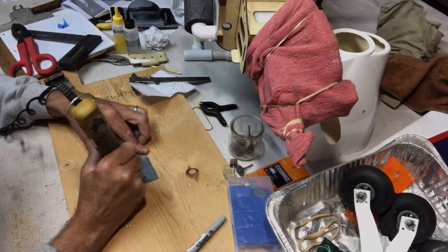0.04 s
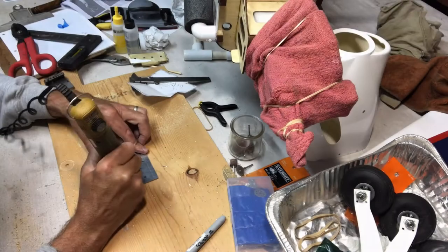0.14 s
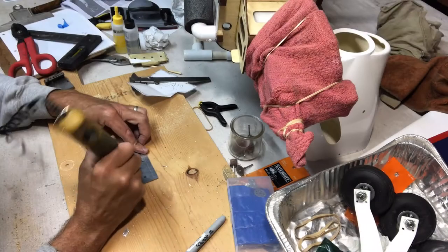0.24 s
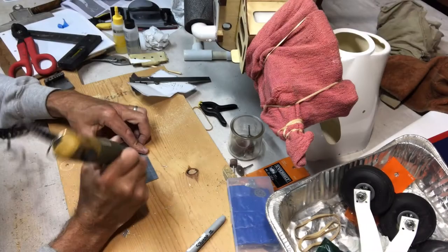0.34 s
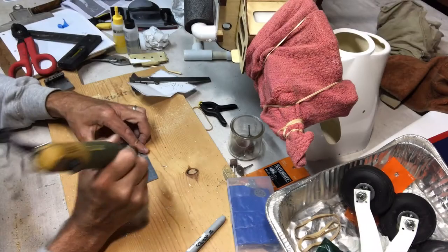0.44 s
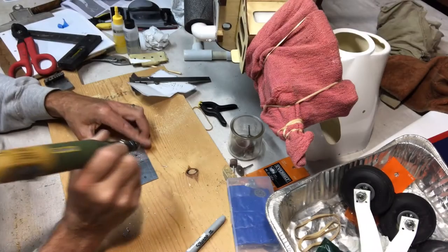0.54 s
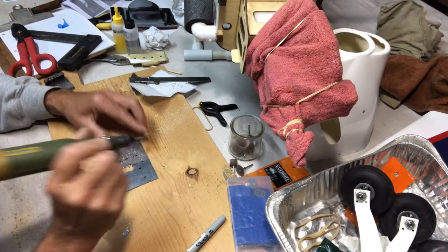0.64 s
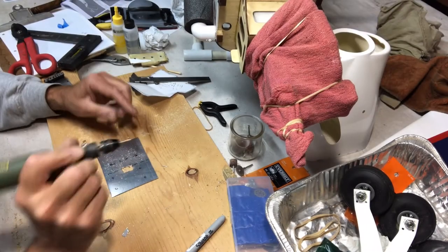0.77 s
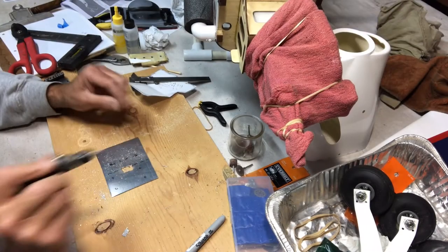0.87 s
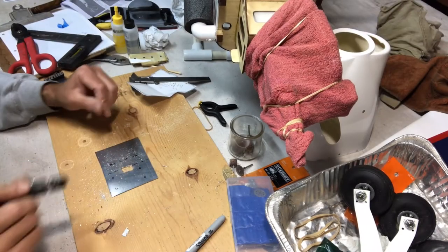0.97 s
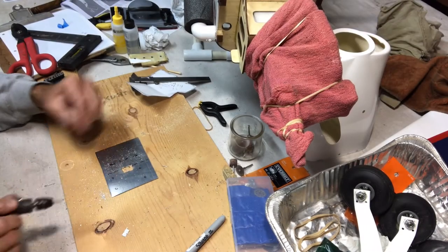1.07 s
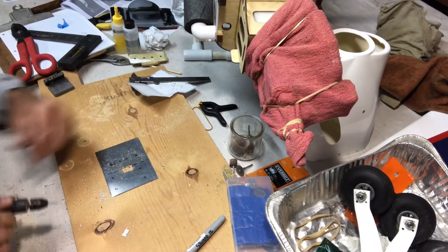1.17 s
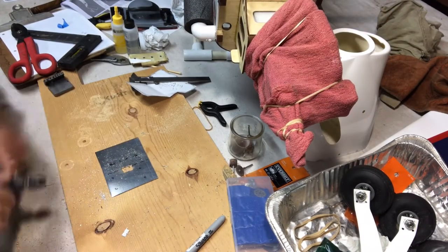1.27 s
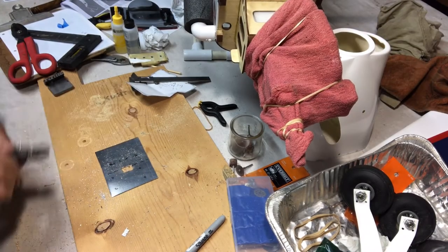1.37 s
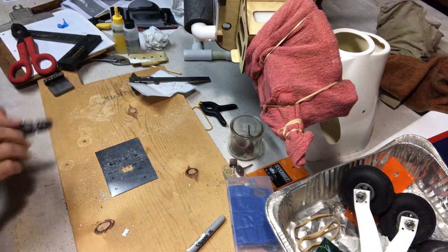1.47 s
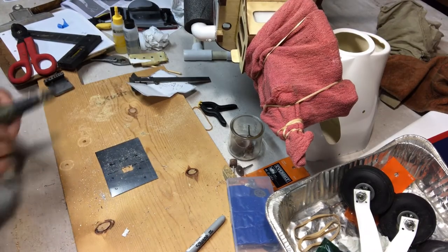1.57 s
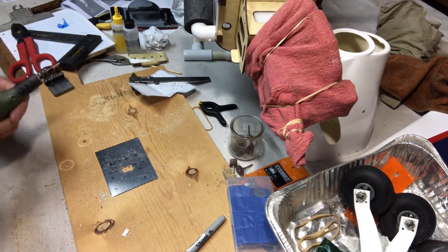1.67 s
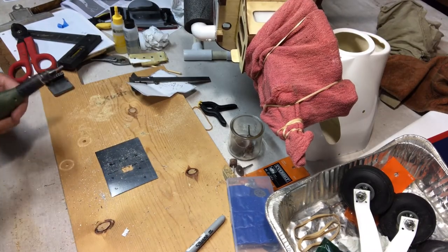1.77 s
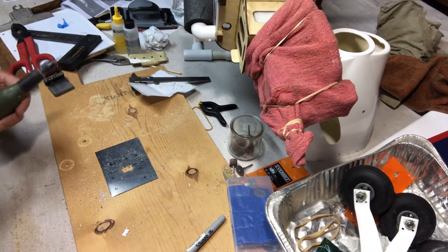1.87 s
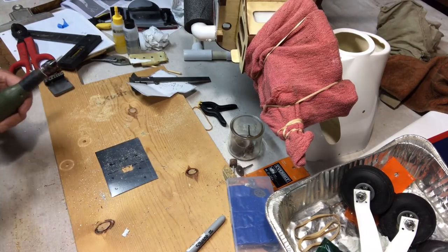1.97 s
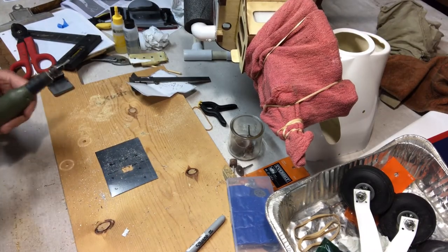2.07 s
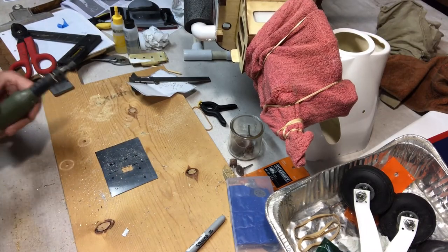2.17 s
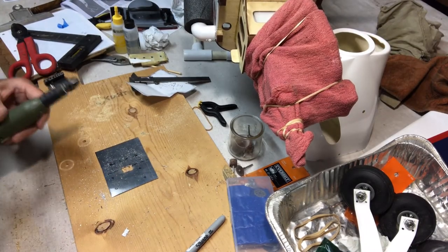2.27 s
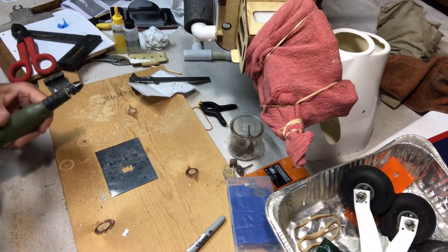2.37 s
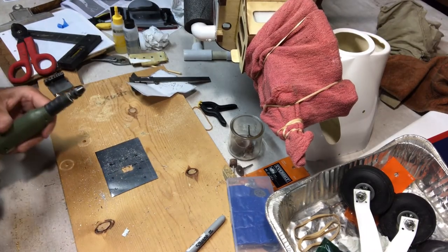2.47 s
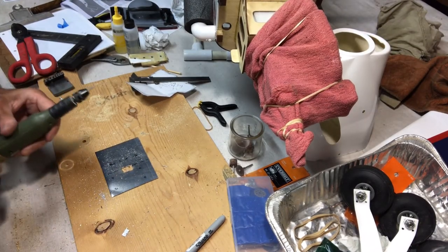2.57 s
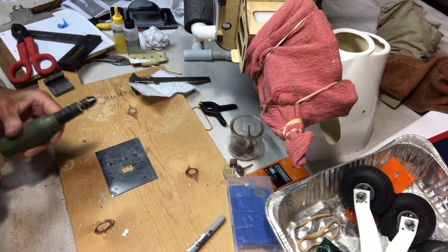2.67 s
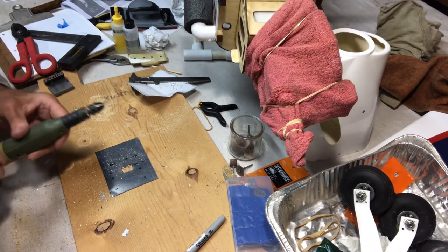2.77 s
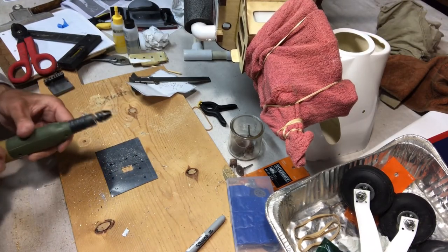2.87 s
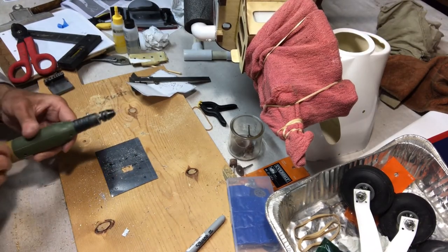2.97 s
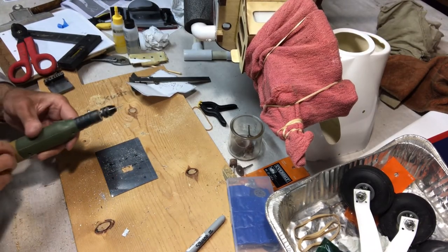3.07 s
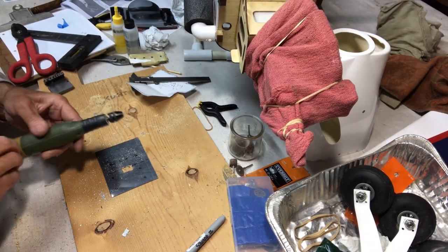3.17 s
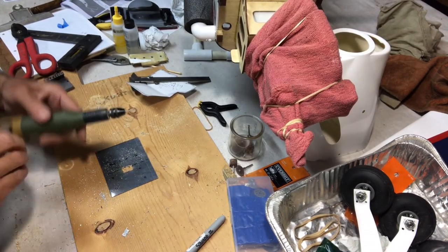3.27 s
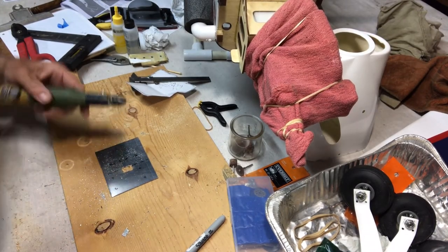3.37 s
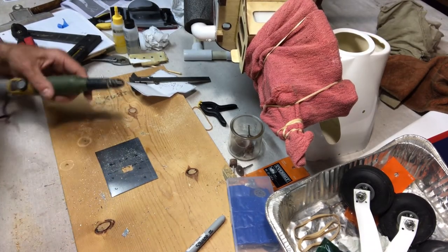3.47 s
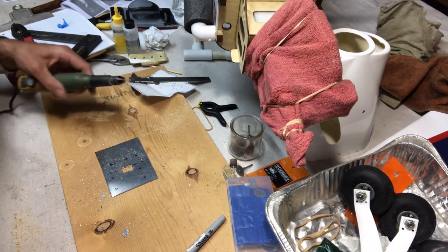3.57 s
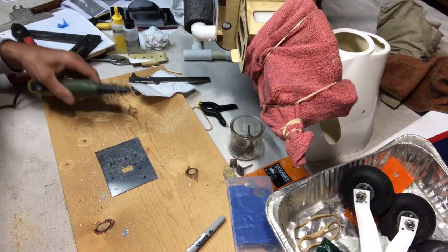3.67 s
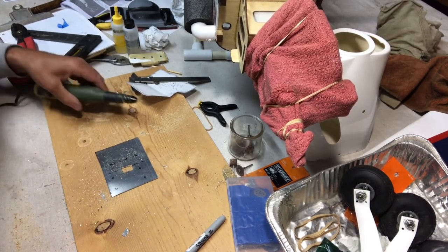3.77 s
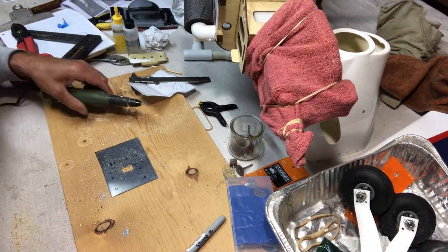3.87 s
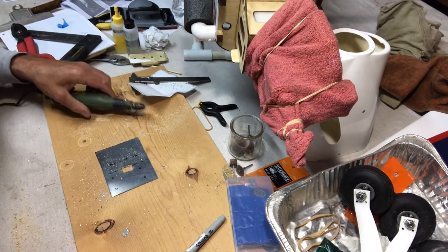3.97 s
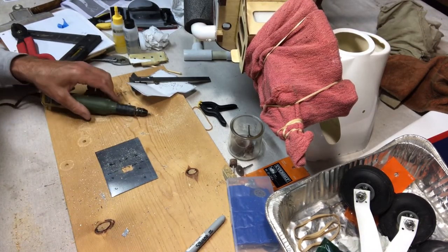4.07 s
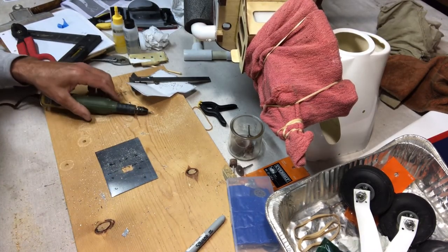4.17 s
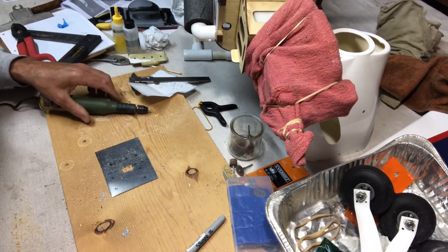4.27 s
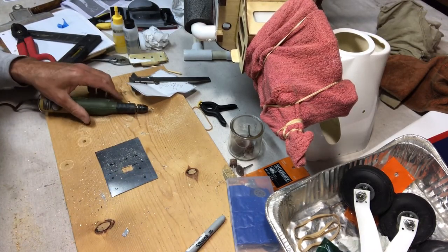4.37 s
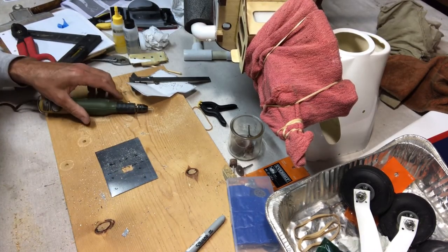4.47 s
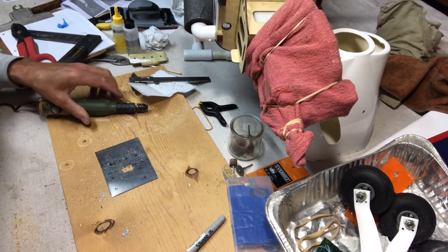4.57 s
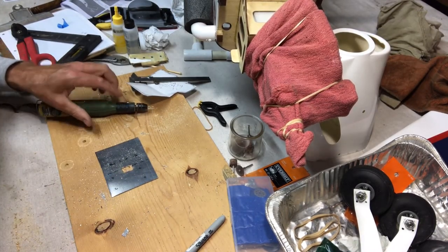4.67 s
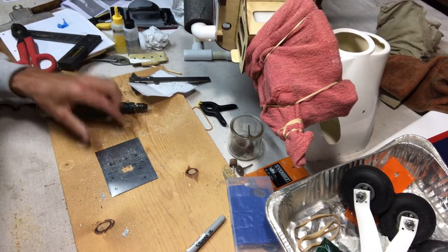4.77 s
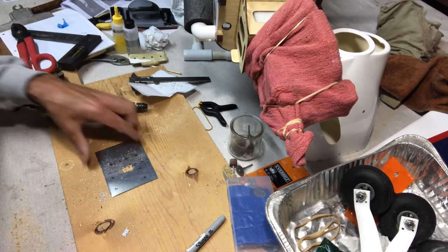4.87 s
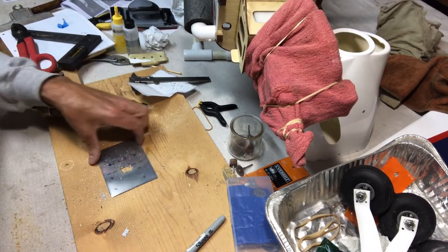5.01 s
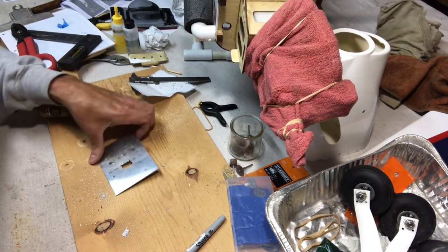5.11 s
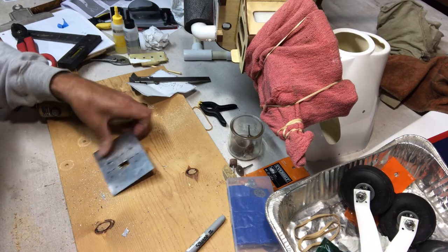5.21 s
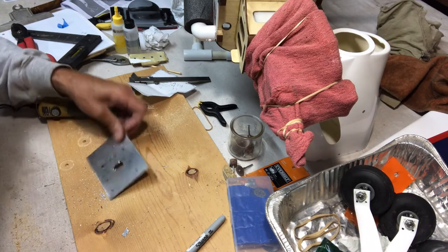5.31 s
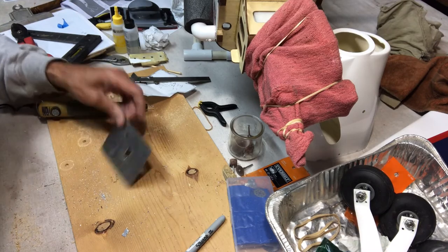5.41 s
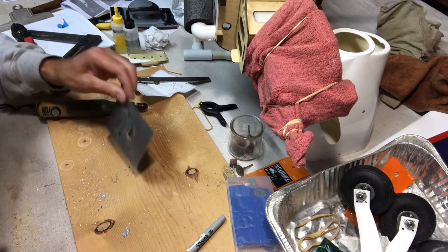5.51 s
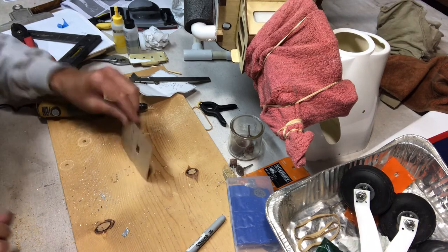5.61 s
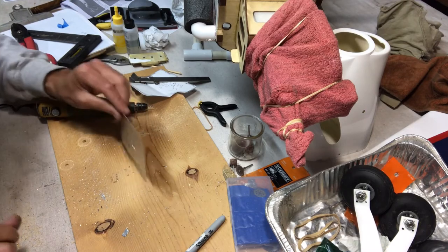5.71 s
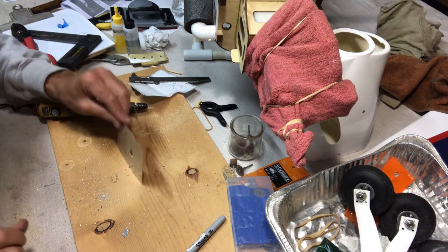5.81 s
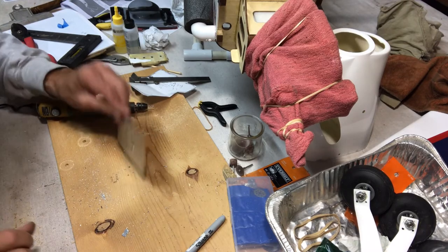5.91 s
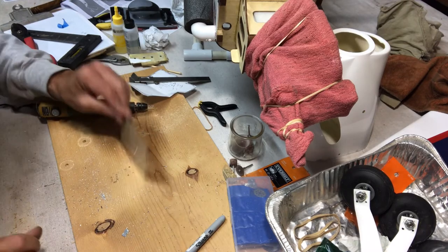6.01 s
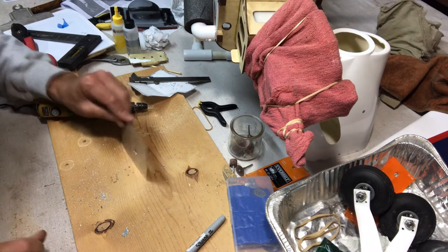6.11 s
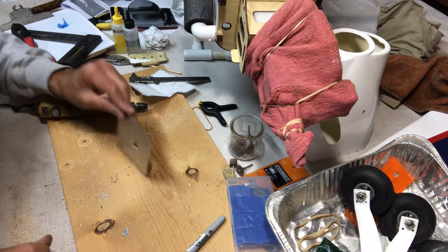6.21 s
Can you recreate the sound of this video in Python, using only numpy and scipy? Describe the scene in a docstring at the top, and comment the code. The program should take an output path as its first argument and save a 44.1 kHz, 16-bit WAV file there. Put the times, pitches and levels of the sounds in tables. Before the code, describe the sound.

A small rotary tool leaves thin metal, whines freely, winds down to a rattling stop, then a metal sheet is dragged up and rapped on wood.

```python
"""Rotary tool and thin sheet metal

A small rotary tool leaves a thin metal sheet, whines free, is switched off, coasts down, is laid on a wooden bench.
A hand rustles over, drags the sheet up so that it rings, and taps its edge four times on the bench, clipping.
Tool: sines on shaft multiples, casing-filtered noise beaten once a turn, vent noise. Contacts: noise into damped modes.
Hand: noise swells and stutter. Whistle: two gliding near-sines. All but shop noise and sway gets a short room tail.
"""
import sys
import numpy as np
from scipy import signal
from scipy.fft import rfft, irfft
from scipy.io import wavfile
from scipy.ndimage import uniform_filter1d, map_coordinates

SR = 44100
rng = np.random.default_rng(int(sys.argv[2]) if len(sys.argv) > 2 else 0)


def generate_wav(signal):
    """Clip the signal to [-1, 1] and save it as 16-bit WAV at the path in sys.argv[1]."""
    frames = np.transpose(np.atleast_2d(signal))
    scaled = np.clip(frames, -1, 1) * 32767
    pcm = np.round(scaled).astype(np.int16)
    wavfile.write(sys.argv[1], SR, pcm)


N = 275625
TIME = np.arange(N) / SR


def undb(db):
    """dB to amplitude ratio."""
    return 10 ** (np.asarray(db) / 20)


def unit(x):
    """Scale to rms 1."""
    return x / np.sqrt(np.mean(x ** 2))


def noise(count=N):
    """White Gaussian noise."""
    return rng.standard_normal(count)


def columns(table, outside=-120.):
    """Table columns as curves in time; `outside` beyond the table's ends."""
    s, *rest = np.transpose(table)
    return [np.interp(TIME, s, c, outside, outside) for c in rest]


def humps(table, rise=0.96):
    """One gain curve per dB column: a bell per row (centre, width), rising side narrowed by `rise`."""
    out = np.zeros((len(table[0]) - 2, N))
    for s, width, *db in table:
        near = slice(max(int((s - 4 * width) * SR), 0), int((s + 4 * width) * SR))
        t = TIME[near] - s
        side_width = np.where(t < 0, rise * width, width)
        out[:, near] += np.outer(undb(db), np.exp(-.5 * (t / side_width) ** 2))
    return out


def colour(x, points):
    """Filter by (Hz, dB) points on a log-frequency axis; rms 1."""
    hz, db = np.transpose(points)
    f = np.arange(N // 2 + 1) * SR / N + 1
    gain = undb(np.interp(np.log(f), np.log(hz), db, -90, -90))
    return unit(irfft(rfft(x) * gain, N))


def band(x, hz, width_hz):
    """Two-pole resonance, gain 1 at the centre."""
    return signal.lfilter(*signal.iirpeak(min(hz, .45 * SR), hz / width_hz, SR), x)


def steep(x, hz, width_hz):
    """Resonance applied twice; rms 1."""
    return unit(band(band(x, hz, width_hz), hz, width_hz))


def ring(force, modes):
    """Damped modes (Hz, dB, t60 s) driven by a force."""
    out = 0
    for hz, db, t60_s in modes:
        r = np.exp(-np.log(1000) / (t60_s * SR))
        w = 2 * np.pi * hz / SR
        out = out + undb(db) * signal.lfilter([0, r * np.sin(w)], [1, -2 * r * np.cos(w), r * r], force)
    return out


def walk(rate_hz):
    """Random levels held 1 / rate_hz s and slewed twice; spread near 1."""
    hold = max(int(SR / rate_hz / 32), 1)
    coarse = np.repeat(noise(N // 256), hold)[:N // 32 + 1]
    coarse = uniform_filter1d(uniform_filter1d(coarse, hold), hold)
    return 1.3 * uniform_filter1d(np.repeat(coarse, 32)[:N], size=32)


def grit(spread_db):
    """Noise of uneven grains; rms 1."""
    return unit(noise() * undb(spread_db * np.minimum(rng.exponential(size=N), 4)))


def clatter(turn, renew_turns):
    """Noise repeating every turn, renewed over `renew_turns`: blurred lines on all orders; rms 1."""
    pattern = noise((512, 128))
    where = [turn / renew_turns, turn % 1 * 128]
    return unit(map_coordinates(pattern, where, order=1, mode="grid-wrap"))


# shop noise spectrum: [f/Hz, relative level/dB per Hz]
SHOP_SPECTRUM = [(53, -18), (90, -1.5), (135, -26.5), (170, -3.5), (240, -10.5), (488, -9.5), (753, -14.5),
                 (956, -23), (1870, -18.5), (4170, -29), (12500, -26), (14000, -35.5), (16000, -44)]
SHOP_DB, SHOP_SWELL_DB = -61, 2.5


def shop():
    """Low-weighted background noise, slowly swelling."""
    return undb(SHOP_DB + SHOP_SWELL_DB * walk(2.35)) * colour(noise(), SHOP_SPECTRUM)


# bench and mount set swaying under the microphone: [centre t/s, width/s, sway level/dB, buffeting level/dB]
SWAYS = [(1.0, 0.36, -37, -67), (1.5, 0.1, -25.5, -39.5), (1.76, 0.14, -34, -72),
         (3.43, 0.07, -28.5, -58.5), (3.7, 0.17, -30.5, -48.5), (3.975, 0.0073, -31.5, -22.5),
         (4.1, 0.1, -31.5, -44.5), (4.39, 0.043, -45.5, -75.5), (4.7, 0.023, -38, -61),
         (4.96, 0.13, -32, -55.5), (5.2, 0.096, -50, -56.5), (5.58, 0.041, -25, -49),
         (5.72, 0.033, -23.5, -30), (5.9, 0.087, -24.5, -40), (6.05, 0.022, -25, -46),
         (6.13, 0.072, -27, -48)]
# sway spectrum: [f/Hz, relative level/dB per Hz]
SWAY_SPECTRUM = [(5.9, -21.5), (10, 12), (20, -7.5), (60, -14.5), (78, -49.5), (130, -120)]
CALM_SWAY_DB, CALM_BUFFET_DB = -45, -59


def mount_sway():
    """Low-frequency noise: sway plus buffeting near 45 Hz, swelling over a calm floor."""
    sway, buffet = humps(SWAYS) + undb([[CALM_SWAY_DB], [CALM_BUFFET_DB]])
    return sway * colour(noise(), SWAY_SPECTRUM) + buffet * steep(noise(), 45.0, 75.0)


FREE_HZ, LOAD_HZ, RELIEF_S, RECOVER_S = 379.1, 23.5, .05, .23
OFF_S, FRICTION_HZ_PER_S, DRAG_PER_S = 2.1016, 127.9, .4788


def shaft():
    """Turns per second: held down by the bite, recovers; after switch-off friction and air drag slow it."""
    driven = FREE_HZ - LOAD_HZ * np.exp(-np.maximum(TIME - RELIEF_S, 0) / RECOVER_S)
    stall = FRICTION_HZ_PER_S / DRAG_PER_S
    coasting = (driven + stall) * np.exp(-DRAG_PER_S * np.maximum(TIME - OFF_S, 0)) - stall
    return np.maximum(coasting, 0)


# the bit's last catches in the sheet: [centre t/s, width/s, knocking level/dB, screech level/dB]
BITE = [(.005, 0.019, -46, -35), (.081, 0.011, -35.5, -31), (.098, 0.0051, -36.5, -43),
        (.114, 0.0051, -44, -29)]


def bite(turn):
    """Once-a-turn decaying strikes and uneven grains, both through resonances."""
    knocking, screeching = humps(BITE)
    strike = np.exp(-(turn % 1) / 0.032)
    knock = steep(strike, 700.0, 610.0) + steep(strike, 3740.0, 570.0)
    knock += .5 * steep(strike, 1470.0, 320.0) + 1.25 * steep(strike, 5900.0, 2000.)
    screech = unit(band(grit(5.2), 6200.0, 15000.0)) + 0.93 * steep(grit(6.5), 9600.0, 970.0)
    screech += .5 * steep(grit(4.2), 6700.0, 670.0) + 0.76 * steep(grit(0.85), 2140.0, 400.0)
    return knocking * knock + screeching * screech


# tones: [multiple of shaft rate, relative level/dB]; levels apply to multiples without a column below
ORDERS = [(1, -8), (2, -6), (3, -0.5), (4, -7), (5, -5), (6, -6), (7, -5), (8, -4), (9, -5.5), (10, -13.5),
          (11, -4.5), (12, -19.5), (13, -11.5), (14, -14), (15, -9.5), (16, -9), (17, -7), (18, -6),
          (19, -19), (20, 0), (21, -12), (22, -14), (23, -7.5), (24, -2), (25, -10), (26, -4), (27, -29),
          (28, -13.5), (29, -22.5), (30, -24.5), (31, -27), (32, -7.5), (33, -18), (34, -18.5)]
# clearest tones as the tool turns: [t/s, level/dB of unbalance hum, fan, collet, brush, slot, top whine]
WHINE = [(0, -27, -62, -54, -49, -38, -56), (.07, -34.5, -65, -42, -39, -32, -51),
         (.11, -45, -54.5, -55, -36, -36, -63), (.44, -47.5, -43.5, -62, -41, -38.5, -65),
         (.6, -45, -46, -43.5, -30.5, -36, -52), (.84, -39, -56, -40.5, -33, -44.5, -41),
         (1.05, -34.5, -34, -34.5, -24.5, -54, -41), (1.19, -36, -39.5, -55, -38.5, -27.5, -31),
         (1.34, -41, -32, -54, -16.5, -27.5, -38), (1.47, -39, -33.5, -55, -38, -33, -44.5),
         (1.65, -36.5, -34, -45, -32.5, -25, -31), (1.87, -37, -32.5, -41, -30, -29.5, -43),
         (2.09, -38, -33, -48, -37.5, -40, -64), (2.2, -39, -30, -47.5, -34, -29, -66),
         (2.43, -44, -38, -49, -63, -70, -43), (2.7, -48.5, -39, -48, -55.5, -41, -67),
         (3, -76, -52, -59, -73, -70, -71), (3.4, -75, -68, -64, -68, -73.5, -75)]
# shaft multiples of the WHINE level columns
WHINE_ORDERS = (1, 5, 8, 20, 24, 28)
# further tones: [t/s, five levels/dB]
OVERTONES = [(0, -39, -39, -55, -60, -53), (0.05, -34, -49, -54, -54, -50), (0.1, -40, -34, -53, -50, -49),
             (0.14, -63, -55, -45, -70, -55), (0.3, -61, -44.5, -49, -67, -60),
             (0.55, -54.5, -56, -57, -54, -47.5), (0.75, -54, -46, -72, -57, -51),
             (0.95, -43.5, -37, -63, -37, -35), (1.15, -44.5, -43.5, -49, -41.5, -45),
             (1.35, -62, -38, -45.5, -49, -36.5), (1.55, -42, -39, -40.5, -45, -36),
             (1.75, -52, -43, -43.5, -50, -47.5), (1.95, -66, -53, -41, -53, -41),
             (2.1, -50, -36, -46, -42, -42), (2.25, -51, -39.5, -43, -43, -42),
             (2.4, -53.5, -53, -37, -52, -53), (2.6, -59.5, -54, -55, -59, -49),
             (2.8, -65, -56, -44, -65, -67), (3.05, -74, -83, -66, -64, -48),
             (3.4, -67, -67, -63, -75, -75)]
# shaft multiples of the OVERTONES level columns
OVERTONE_ORDERS = (2, 3, 6, 14, 16)
# casing response to the gliding tones, except overtones, while coasting: [f/Hz, gain/dB]
COASTING = [(300, -4.5), (1000, 2), (1400, -7), (1900, 1.5), (2600, 9), (3500, -13), (4300, -18),
            (5100, -9), (5900, -16), (8000, -6), (13000, 3)]
WAVER_TURNS_PER_ORDER = .0065  # blurs the higher tones more
WHINING = slice(int(3.5 * SR))  # tones computed up to 3.5 s


def shaft_tones(hz, turn, log_speed, coast, air_db, boom_db, collet_db):
    """Sines on shaft multiples, wavering in level and phase."""
    tabled = dict(zip(WHINE_ORDERS + OVERTONE_ORDERS, columns(WHINE) + columns(OVERTONES)))
    coast_hz, coast_db = np.transpose(COASTING)
    tones = np.zeros(N)
    for order, db in ORDERS:
        k = round(order)
        if k in tabled:
            level_db = tabled[k]
        else:  # follow the noise near them; higher ones fade faster with speed
            if k < 6:
                follow_db = boom_db - 8 + 40 * log_speed
            elif k < 12:
                follow_db = collet_db - 8 + 70 * log_speed
            else:
                follow_db = air_db - 8 + 75 * log_speed
            level_db = follow_db + db - 2.5 + 4.14 * walk(4.25)
        if k not in OVERTONE_ORDERS:
            level_db = level_db + coast * np.interp(k * hz, coast_hz, coast_db)
        level_db = level_db + min(0.53 * k, 2.2) * walk(30.5)
        start_turns = rng.random()
        waver_turns = (0.042 + WAVER_TURNS_PER_ORDER * k) * walk(25.)
        phase = 2 * np.pi * (k * turn + start_turns + waver_turns)
        tones[WHINING] += np.sqrt(2) * undb(level_db[WHINING]) * np.sin(phase[WHINING])
    return tones


def turn_beat(hz, turn):
    """Gain decaying within each turn; at low speed each turn is its own uneven knock."""
    slow = np.clip(1 - hz / 190, 0, 1)
    knock_size = undb(4 * noise(2048))[turn.astype(int)]
    decay = np.exp(-(turn % 1) / (0.44 - 0.067 * slow))
    beat = 1 - (0.15 + .5 * slow) * (1 - 5.83 * decay * knock_size ** slow)
    return uniform_filter1d(beat, size=48) * (1 - slow) + uniform_filter1d(beat, size=130) * slow


# housing, nose, collet, brush caps: [f/Hz, width/Hz]
CASING = [(1085, 380), (1920, 520), (2900, 1700), (5400, 2400)]


def casing_rattle(turn, beat, repeat, casing_db):
    """Beaten, partly turn-repeating noise in the casing resonances, over a low murmur."""
    loose = .4 * repeat
    rattle = 0
    for (hz, width_hz), db in zip(CASING, casing_db):
        level = undb(db + 1.6 * walk(14)) / np.hypot(1, loose)
        drive = beat * (noise() + loose * clatter(turn, 4.))
        rattle = rattle + level * steep(drive, hz, width_hz)
    murmur = undb(casing_db[0] - 16) * unit(band(noise(), 580.0, 1100.0))
    return rattle + murmur


# vent noise colour: [f/Hz, gain/dB]
VENTS = [(3820, -57), (6500, -4), (8890, 3), (9800, 1), (12300, 2.5), (13300, -2), (14700, -14.5),
         (15200, -18.5), (16000, -8)]
# casing resonances lit by gliding shaft orders while coasting: [f/Hz, width/Hz, level/dB re air rush]
SINGING = [(5080, 680, -21), (8450, 800, -5), (11500, 2000, -14)]
PATCHY_DB, SINGING_FADE_DB_PER_S = 1, 8
SWISH_ORDER, SWISH_WIDTH_HZ, SWISH_DB = 40, 450, -20  # SWISH_DB re air rush at full speed


def vent_air(turn, beat, repeat, log_speed, coast, air_db):
    """Air through the vents in separately swelling bands, a swish gliding with the shaft, coasting resonances."""
    gust = (0.5 + 0.42 * beat) * (grit(6.3) + repeat * clatter(turn, 9.))
    patches = sum(undb(PATCHY_DB * walk(4.15)) * band(gust, f, 0.25 * f) for f in 4000 * 1.2 ** np.arange(8))
    rush = colour(patches, VENTS) / np.hypot(1, repeat) * undb(air_db + 0.85 * walk(13.0))
    # near-DC noise shifted up to a shaft multiple
    swish = steep(noise(), 0.93, SWISH_WIDTH_HZ) * np.sin(2 * np.pi * SWISH_ORDER * turn)
    swish = undb(air_db + SWISH_DB + 20 * log_speed) * swish
    pattern = clatter(turn, 32.)
    singing = 0
    for hz, width_hz, db in SINGING:
        level_db = air_db + db - SINGING_FADE_DB_PER_S * (TIME - OFF_S) + 2.1 * walk(7.91)
        singing = singing + undb(level_db) * steep(pattern, hz, width_hz)
    return rush + swish + coast * singing


# tool as carried and turned: [t/s, level/dB of air rush, housing boom, nose rattle, collet rattle, brush-cap hiss]
HELD = [(0, -34, -36.5, -49, -36.5, -36), (.17, -34, -41, -46, -38.5, -43),
        (.5, -30.5, -40.5, -44.5, -39, -43.5), (.72, -27.5, -40, -58, -35, -36.5),
        (.92, -23, -35, -59, -30.5, -37), (1.03, -22.5, -33.5, -47, -28.5, -34),
        (1.15, -24, -31, -52, -31.5, -38), (1.42, -21.5, -28.5, -45, -28, -32.5),
        (1.55, -23.5, -29.5, -34, -32.5, -33.5), (1.9, -22.5, -28.5, -34.5, -33.5, -33),
        (2.13, -21.5, -33, -37, -32.5, -39), (2.22, -23, -32, -34, -33, -33),
        (2.4, -26, -32.5, -33.5, -39, -36.5), (2.55, -27, -35.5, -29, -41, -35),
        (2.7, -28, -38.5, -30.5, -40.5, -36), (2.84, -30.5, -39, -35, -42, -41),
        (2.96, -29.5, -45, -40, -43.5, -37), (3.08, -34.5, -48, -40, -45, -39),
        (3.2, -37.5, -44, -32.5, -44.5, -46), (3.35, -39, -55, -40.5, -49, -45),
        (3.46, -44.5, -54, -51, -45.5, -53), (3.65, -55, -64, -57, -55, -60),
        (3.75, -56, -61.5, -69, -64, -70), (3.9, -65, -59, -61, -68, -72)]
COAST_ONSET_S = 0.14


def motor():
    """One shaft angle drives the tones, casing rattle, vent air and bite."""
    hz = shaft()
    air_db, *casing_db = columns(HELD)
    turn = np.cumsum(hz * (1 + 0.000397 * walk(60))) / SR
    log_speed = np.log10(hz / hz.max() + 0.0074)
    coast = np.clip((TIME - OFF_S) / COAST_ONSET_S, 0, 1)
    tones = shaft_tones(hz, turn, log_speed, coast, air_db, casing_db[0], casing_db[2])
    beat = turn_beat(hz, turn)
    # loose parts repeat their pattern more faithfully at lower speed
    repeat = 0.44 + np.clip(-6 * log_speed, 0, .25)
    rattle = casing_rattle(turn, beat, repeat, casing_db)
    air = vent_air(turn, beat, repeat, log_speed, coast, air_db)
    return tones + rattle + air + bite(turn)


# last slow turns catching one by one: [t/s, level/dB]
CATCHES = [(3.2277, -32), (3.3252, -29), (3.36, -31), (3.3784, -28), (3.428, -35), (3.4617, -29),
           (3.505, -33), (3.532, -35), (3.5676, -33), (3.6096, -34), (3.661, -39.5), (3.635, -38),
           (3.7398, -48.5), (3.753, -42), (3.763, -42), (3.772, -41.5)]
CATCH_S = 0.0051


def catches():
    """Short noise rasps of the slowing shaft, resonating in nose and collet."""
    rasp = np.zeros(N)
    t = TIME[:1024] / CATCH_S
    for s, db in CATCHES:
        i = int(s * SR)
        rasp[i:i + len(t)] += undb(db) * noise(len(t)) * np.minimum(4 * t, 1) * np.exp(-t)
    nose = 3.2 * band(band(rasp, 1920., 860.0), 1920., 860.0)
    collet = 2.2 * band(band(rasp, 3100.0, 1200.0), 3100.0, 1200.0)
    return nose + collet


# tool, cable and fingernails: [t/s, level/dB, f/Hz]
TICKS = [(3.82, -35, 3130), (3.834, -42, 1600), (4.0598, -55.5, 9900), (4.853, -34.5, 9320),
         (4.858, -51, 4000), (4.912, -33, 9410), (4.9462, -39, 3000), (4.9663, -30.5, 5500),
         (5.1083, -42, 3000), (5.1442, -31, 2900), (5.18, -29, 2860), (5.2335, -27, 2950),
         (5.4779, -56, 8200)]


def ticks():
    """Few-millisecond decaying noise clicks, band-passed."""
    out = np.zeros(N)
    t = TIME[:2048]
    for s, db, hz in TICKS:
        i = int(s * SR)
        out[i:i + len(t)] += undb(db) * band(noise(len(t)) * np.exp(-t / 0.006), hz, 0.5 * hz)
    return out


# cloth and skin brushing the bench: [peak t/s, width/s, hiss level/dB, body level/dB]
BRUSHES = [(3.875, 0.094, -51.5, -71), (4.04, 0.036, -77, -65), (4.105, 0.025, -55.5, -68),
           (4.2, 0.0083, -61.5, -61), (4.283, 0.029, -54, -69.5), (4.325, 0.017, -59, -84),
           (4.416, 0.029, -60.5, -61), (4.492, 0.051, -51.5, -52), (4.545, 0.051, -56.5, -57.5),
           (4.68, 0.13, -60, -61.5), (4.853, 0.0051, -44, -47), (4.875, 0.028, -57, -55),
           (4.912, 0.021, -46, -64), (4.965, 0.029, -42.5, -45), (5.02, 0.046, -65, -49),
           (5.11, 0.045, -41.5, -51), (5.34, .02, -54, -72), (5.385, 0.012, -54, -75),
           (5.49, 0.039, -55, -70)]
# sliding-hand hiss: [f/Hz, gain/dB]
SKIN = [(3000, -9.5), (6000, -7.5), (9000, 0.5), (12500, -0.5), (14000, -7), (16300, -10)]
# sheet jerking over the wood: [peak t/s, width/s, level/dB of slips under the fingers, of the freed sheet]
JERKS = [(4.948, 0.01, -52, -66), (4.978, 0.0077, -41.5, -85), (5.05, 0.034, -45.5, -85),
         (5.14, 0.037, -31.5, -52.5), (5.175, 0.004, -27, -65), (5.2, 0.019, -45, -70),
         (5.232, 0.0034, -25.5, -45), (5.25, 0.032, -34, -55), (5.281, 0.0063, -56, -28.5),
         (5.294, 0.0091, -26, -41), (5.307, 0.0034, -33.5, -37)]
# modes of the free sheet: [f/Hz, level/dB, t60/s]
SHEET = [(501, -22, .18), (1712, -6, .25), (1846, -13, .1), (2945, -7, .16), (4689, -13, .06),
         (5905, -16, .08), (7020, -13, .08), (7671, -18, .12), (8253, -5, .05), (9300, -9, .07),
         (9690, -10, .09), (10300, -7, .06), (11230, -7, .065), (12400, -13, .03), (13400, -13, .03)]
SNAP = 0.25  # hand movements start this much quicker than they end


def hand():
    """Sliding cloth and skin as noise; the sheet's stuttering slips drive its modes and the wood."""
    hiss, body = humps(BRUSHES, SNAP) * undb(0.76 * walk(90))
    rustle = hiss * colour(grit(3.8), SKIN) + body * steep(grit(1.3), 370.0, 1900.0)
    held, free = humps(JERKS, SNAP) * undb(1.0 * walk(120)) * grit(6.3)
    # fingers shorten and weaken the modes
    pressed = [(hz, db - 6 * (hz < 2000) - 4 * (hz > 9500), min(0.4 * t60, .03)) for hz, db, t60 in SHEET]
    sheet = undb(-24.5) * ring(held, pressed) + undb(-21) * ring(free, SHEET)
    scrape = 0.1 * band(held + free, 5800.0, 11870.0)
    wood = 0.39 * band(held + free, 1800.0, 2600.0)
    return rustle + sheet + scrape + wood


# bench blows: [t/s, level/dB, hardness f/Hz, sheet ring level/dB, clatter level/dB, chatter decay/s]
BLOWS = [(3.9584, 1, 380, -74, -10, 0.00056), (3.9746, -16, 2000, -82.5, -13, 0.0012),
         (3.9809, -10, 1390, -87, -25, 0.00043), (3.991, -50, 9000, -88, 3, 0.0027),
         (5.5351, 5.5, 1270, -17.5, -15, 0.0014), (5.5475, -6, 1300, -42, -7.5, 0.0015),
         (5.6942, 3.5, 2900, -21.5, -5.5, 0.002), (5.8640, 5.5, 2400, -38, -10.5, 0.0042),
         (5.9160, -29.5, 6000, -14, -10, .001), (6.0358, 9.5, 3850, -26.5, -6.5, 0.0023),
         (6.1, -15.5, 1510, -47, -8, 0.0022)]
# bench-top modes: [f/Hz, level/dB, t60/s]
BENCH = [(375, 1, .032), (530, -1, .028), (630, -2, .025), (743, -1, .03), (930, -2, .025),
         (1180, -2, .025), (1400, -2, .025), (1680, -1, .022), (2062, -3, .018), (2320, -2, .018),
         (2650, -4, .015), (3150, -2, .015), (4100, -6, .01), (5100, -8, .008)]
# free edge of the pinched sheet: [f/Hz, level/dB, t60/s]
EDGE_RING = [(9740, -9, .06)]
# whole bench under a soft heavy blow: [f/Hz, level/dB, t60/s]
THUD = [(176, -22, 0.048), (228, -14, 0.07), (382, 12, 0.028), (636, -5, 0.033)]
THUD_BELOW_HZ, THUD_PUSH_S, THUD_TOP_DB = 500, 0.0016, -12  # hardness limit; push; bench top re thud
SETTLE_S, SETTLE_SHARE = 0.025, 0.07  # loose things keep rattling


def blows():
    """Each blow is a short chatter of contacts into bench and sheet, with a clatter of loose things."""
    out = np.zeros(N)
    t = TIME[:SR // 3]
    pinched = [(hz, db - 13 * (hz > 6000), 0.27 * t60) for hz, db, t60 in SHEET] + EDGE_RING
    for s, db, hard_hz, sheet_db, clatter_db, chatter_s in BLOWS:
        force = noise(len(t)) * (rng.random(len(t)) < .05) * np.exp(-t / chatter_s) * 2.33
        force[0] = -1
        soft = signal.lfilter(*signal.butter(N=2, Wn=min(hard_hz, 15000.), fs=SR), force)
        # the bench top radiates little bass
        wood = signal.lfilter(*signal.butter(6, 330., "high", fs=SR), ring(soft, BENCH))
        crack = band(noise(len(t)), 0.5 * hard_hz, 5400.0) * np.exp(-t / 0.0043)
        shudder = steep(noise(len(t)), 300 + 0.43 * hard_hz, 1500.0) * np.exp(-t / 0.0086)
        settle = steep(noise(len(t)), 300 + 0.68 * hard_hz, 4000.0) * np.exp(-t / SETTLE_S)
        shudder = shudder + SETTLE_SHARE * settle
        shudder = signal.lfilter(*signal.butter(N=4, Wn=340., btype="high", fs=SR), shudder)
        hit = wood / np.abs(wood).max()
        hit = hit + undb(sheet_db) * ring(force, pinched) + undb(clatter_db) * (crack + 0.79 * shudder)
        if hard_hz < THUD_BELOW_HZ:
            thud = ring(-np.sin(np.pi * np.minimum(t / THUD_PUSH_S, 1)), THUD)
            hit = undb(THUD_TOP_DB) * hit + thud / np.abs(thud).max()
        i = int(s * SR)
        out[i:i + len(t)] += (undb(db) * hit)[:N - i]
    return out


# thin whistle arching over as the hand slides away: [t/s, f/Hz, level/dB, lower companion level/dB]
WHISTLE = [(4.56, 10100, -68, -80), (4.6, 11300, -61, -85), (4.625, 12100, -61, -85),
           (4.665, 12200, -64, -66), (4.685, 12850, -61, -64), (4.72, 12750, -61, -63),
           (4.75, 12000, -61, -66), (4.795, 12000, -60, -72), (4.83, 11500, -61, -85),
           (4.86, 10600, -59, -85), (4.905, 9600, -61, -90)]
COMPANION_HZ = 1600  # below the whistle


def whistle():
    """Two slightly unsteady near-sines that bend together."""
    hz, db, low_db = columns(WHISTLE)
    hz = np.maximum(hz, 2 * COMPANION_HZ) * (1 + 0.0016 * walk(80))
    out = 0
    for f, level_db in ((hz, db), (hz - COMPANION_HZ, low_db)):
        sine = np.sin(2 * np.pi * np.cumsum(f) / SR)
        out = out + np.sqrt(2) * undb(level_db + 2.5 * walk(60)) * sine
    return out


# room decay: [f/Hz, t60/s]
ROOM_T60 = [(100, 0.15), (1000, 0.22), (4000, 0.24), (12000, 0.061)]
ROOM_DB = -17.5


def room(x):
    """A small cluttered workshop: octave-band noise tail whose top treble dies first."""
    t = TIME[:SR // 2]
    hz, t60_s = np.transpose(ROOM_T60)
    tail = 0
    for f in 250 * 2. ** np.arange(6):
        decay = undb(-60 * t / np.interp(np.log(f), np.log(hz), t60_s))
        tail = tail + band(noise(len(t)), f, 1.36 * f) * decay
    tail = tail * np.clip(t / 0.00088, 0, 1)
    return undb(ROOM_DB) * signal.fftconvolve(x, tail / np.sqrt(np.sum(tail ** 2)))[:N]


def scene():
    """Near sources with room tail, plus sway and shop noise; two identical channels."""
    near = motor() + blows() + ticks() + catches() + hand() + whistle()
    background = mount_sway() + shop()
    return np.tile(near + room(near) + background, (2, 1))


TOP_HZ = 16300


def record(dry):
    """Converter clips peaks; steep low-pass cuts the top."""
    low_pass = signal.ellip(12, .2, 85, TOP_HZ, fs=SR, output="sos")
    return signal.sosfilt(low_pass, np.clip(dry, -.97, .97))


dry = scene()
out = record(dry)
generate_wav(out)
```